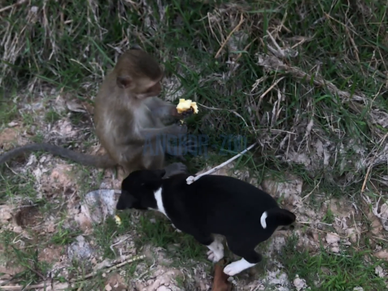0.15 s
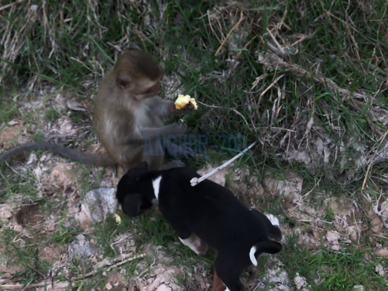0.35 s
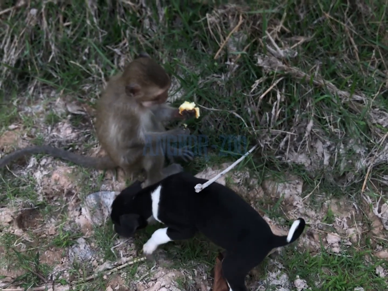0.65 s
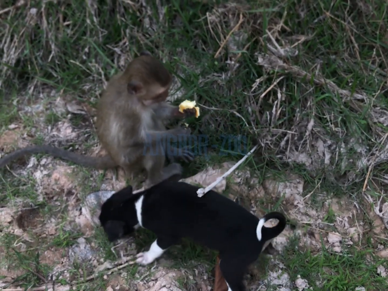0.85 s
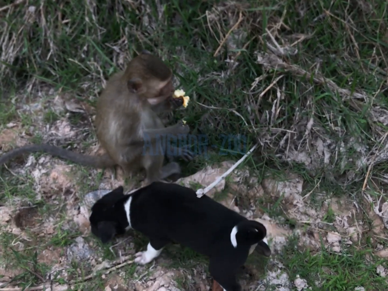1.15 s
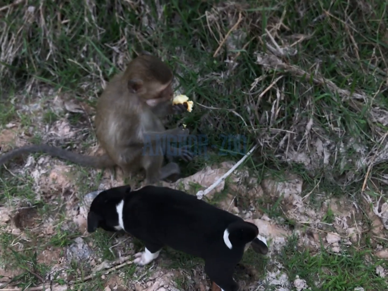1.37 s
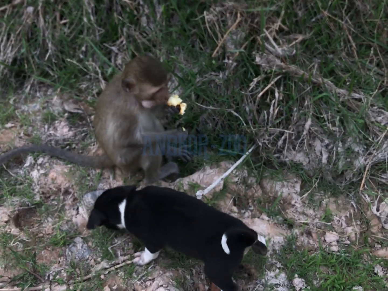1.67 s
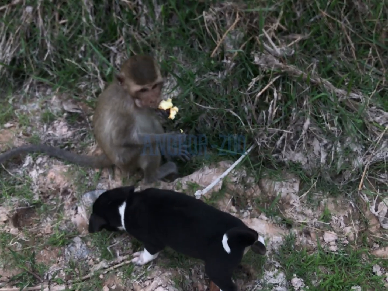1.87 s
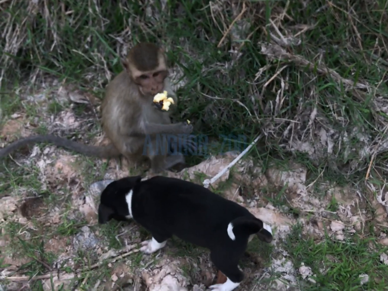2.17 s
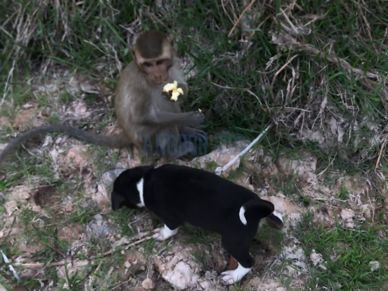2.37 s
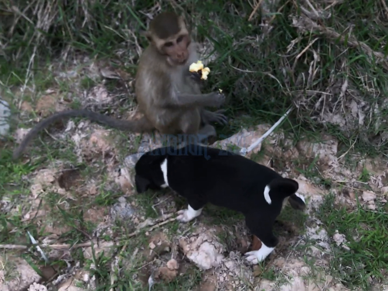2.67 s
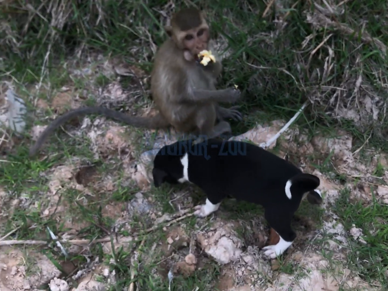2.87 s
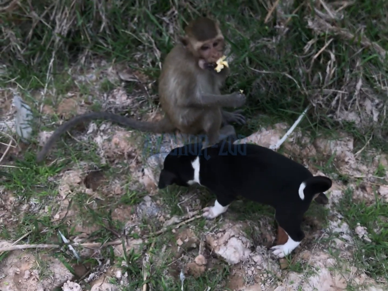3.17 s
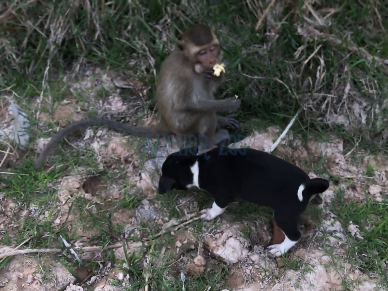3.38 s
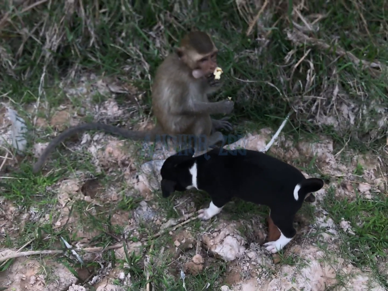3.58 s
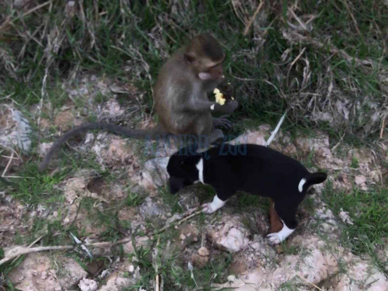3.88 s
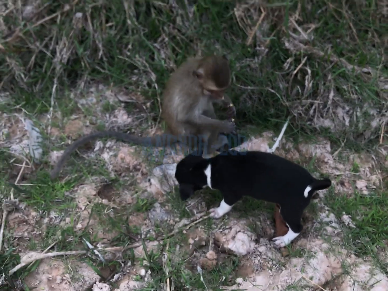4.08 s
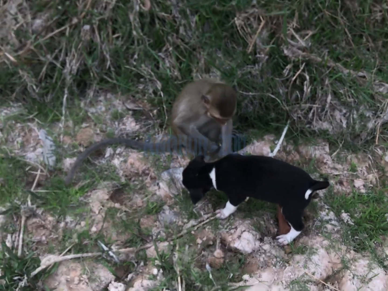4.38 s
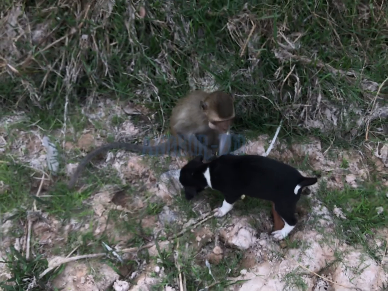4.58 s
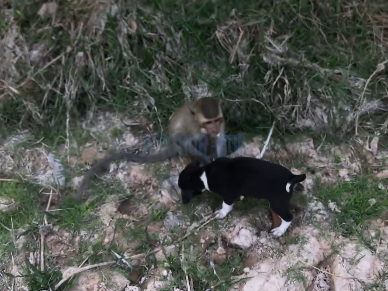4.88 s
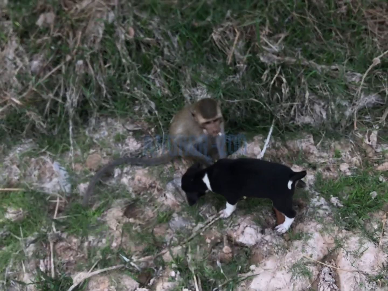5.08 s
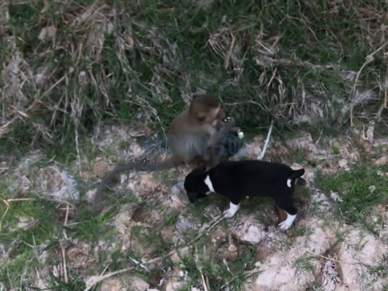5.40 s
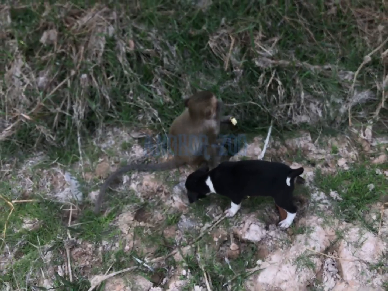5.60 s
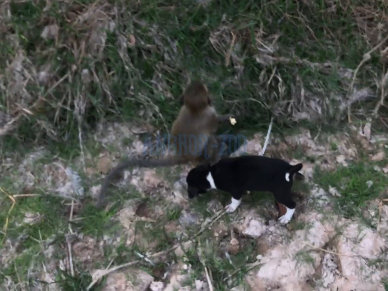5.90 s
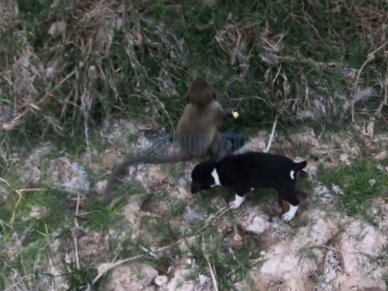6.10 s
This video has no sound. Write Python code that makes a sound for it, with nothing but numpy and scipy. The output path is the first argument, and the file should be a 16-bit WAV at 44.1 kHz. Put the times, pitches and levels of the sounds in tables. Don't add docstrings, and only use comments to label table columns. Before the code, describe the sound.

Outdoors in dry scrub, high clear whistled chirps dip, sweep down and glide up in short phrases, smeared by echoes off trees. A cluster of twig snaps cracks sharply near the start, and lighter rustling and pebble ticks follow midway. A cricket trills in regular bursts that grow louder. Low wind rumble and occasional dull knocks on the case mark a hand-held mono microphone.

```python
import sys
import numpy as np
from scipy import signal
from scipy.fft import rfft, irfft
from scipy.io import wavfile
from scipy.ndimage import uniform_filter1d

SR = 44100
rng = np.random.default_rng(int(sys.argv[2]) if len(sys.argv) > 2 else 0)


def natural_amplitude(level_db):
    exponent = np.asarray(level_db, float) / 20
    return 10 ** exponent


def dump_mix(stems):
    frames = np.atleast_2d(stems).T
    limited = np.clip(frames, -1, 1)
    pcm = np.round(limited * 32767).astype(np.int16)
    wavfile.write(sys.argv[1], SR, pcm)


N = 275625


def level(x, db):
    return x * natural_amplitude(db) / np.sqrt(np.mean(x ** 2))


def colour(x, spectrum):
    hz, db = np.transpose(spectrum)
    f_hz = np.arange(len(x) // 2 + 1) * SR / len(x) + 1
    gain_db = np.interp(np.log(f_hz), np.log(hz), db, -90, -90)
    return irfft(rfft(x) * natural_amplitude(gain_db), len(x))


def band(x, lo_hz, hi_hz):
    return signal.sosfilt(signal.butter(2, [lo_hz, hi_hz], "bandpass", fs=SR, output="sos"), x)


def high_pass(x, hz):
    return signal.sosfiltfilt(signal.butter(2, hz, "highpass", fs=SR, output="sos"), x)


def walk(rate_hz):
    hold = int(SR / rate_hz)
    steps = np.repeat(rng.standard_normal(N // hold + 1), hold)
    return 1.76 * uniform_filter1d(uniform_filter1d(steps, hold), hold)[:N]


def oscillator(hz):
    return np.sin(2 * np.pi * np.cumsum(hz) / SR)


def add(out, start_s, x):
    i = int(start_s * SR)
    out[i:i + len(x)] += x[:N - i]


def swell(rows, rise_db_per_s, fall_db_per_s):
    t = np.arange(N) / SR
    power = np.zeros(N)
    for start_s, hold_s, db in rows:
        before_db = rise_db_per_s * (start_s - t)
        after_db = fall_db_per_s * (t - start_s - hold_s)
        lost_db = np.maximum(np.maximum(before_db, after_db), 0)
        power += natural_amplitude(2 * (db - lost_db))
    return np.sqrt(power)


def sing(shape, accent_db, rows):
    share, height = np.transpose(shape)
    notes = []
    for start_s, length_s, lo_hz, hi_hz, db in rows:
        pitch_hz = lo_hz + (hi_hz - lo_hz) * height
        notes.append(np.transpose([start_s + length_s * share, pitch_hz, db + np.array(accent_db)]))
    return notes


def dip_notes():
    dip_shape = [(-1, .95), (-.5, .42), (0, 0), (.35, .38), (.75, .85), (1, 1)]
    dip_accent = [-3, -2, -8, -2, 2, -1.5]
    # lowest_s, fall_s, rise_s, low_hz, level_db
    dip_rows = [
        (.225, 0.049, 0.095, 2490, -39),
        (.425, .03, .022, 2630, -39),
        (.51, .02, .075, 2730, -43),
        (2.612, 0.036, 0.082, 2403, -41),
        (2.8, .042, .13, 2533, -42.5),
        (5.293, 0.063, 0.075, 2314, -41),
        (5.489, 0.038, 0.083, 2596, -41),
    ]
    top_hz = 2914
    share, height = np.transpose(dip_shape)
    notes = []
    for lowest_s, fall_s, rise_s, low_hz, db in dip_rows:
        time_s = lowest_s + share * np.where(share < 0, fall_s, rise_s)
        pitch_hz = low_hz + (top_hz - low_hz) * height
        notes.append(np.transpose([time_s, pitch_hz, db + np.array(dip_accent)]))
    return notes


def fall_notes():
    fall_accent = [-7, -3, 0, -2, -3, -2, -4, -7]
    # start_s, length_s, start_hz, early_sag, level_db
    fall_rows = [
        (0.59, 0.16, 3714, 1.7, -43),
        (2.935, 0.16, 3526, 1.17, -39),
        (5.583, .203, 3507, .62, -40.5),
    ]
    end_ratio = .805
    share = np.arange(len(fall_accent)) / (len(fall_accent) - 1)
    notes = []
    for start_s, length_s, hz, sag, db in fall_rows:
        pitch_hz = hz * (end_ratio + (1 - end_ratio) * (1 - share) ** sag)
        notes.append(np.transpose([start_s + length_s * share, pitch_hz, db + np.array(fall_accent)]))
    return notes


def song():
    scoop_shape = [(0, .6), (.12, .25), (.33, 0), (.55, .2), (.76, .6), (1, 1)]
    sweep_shape = [(0, 1), (.09, .86), (.2, .66), (.36, .51), (.6, .35), (.8, .16), (1, 0)]
    rise_shape = [(0, 0), (.15, .03), (.3, .16), (.47, .25), (.64, .45), (.83, .69), (1, 1)]
    hook_shape = [(0, 0), (.13, .85), (.45, .85), (.75, .95), (1, 1)]
    climb_shape = [(0, 0), (.35, .3), (.6, .6), (.87, .95), (1, 1)]
    scoop_accent = [-22, -14.5, -15.5, -8.5, -4, -4]
    sweep_accent = [-15, -2, 0, -5, -4, -10, -16]
    rise_accent = [-0.5, -3, -6.5, -2.5, -6, -3, -8]
    hook_accent = [-4, -5, -1, -4.5, -7]
    climb_accent = [-5, -8, 0, -5.5, -1]
    # start_s, length_s, low_hz, high_hz, level_db
    scoop_rows = [
        (2.346, .149, 2270, 3020, -38),
        (5.023, .128, 2323, 2995, -35),
    ]
    sweep_rows = [
        (.862, .22, 2100, 4330, -41),
        (3.33, .207, 1976, 4340, -39.5),
        (5.913, 0.21, 2153, 4170, -35.5),
    ]
    rise_rows = [
        (1.197, .318, 3505, 4720, -44),
        (3.733, .29, 3497, 4780, -41),
    ]
    hook_rows = [
        (1.703, 0.12, 3410, 3620, -36),
        (1.89, 0.12, 3520, 3914, -41.5),
        (4.285, 0.075, 3600, 3728, -38),
        (4.472, 0.21, 3650, 4127, -44.5),
    ]
    climb_rows = [(0.0, .12, 2260, 2900, -38), (1.653, .069, 3850, 4340, -42), (1.95, .12, 2860, 3220, -52),
                  (2.07, .105, 3200, 3900, -41), (2.03, .038, 3910, 4440, -48),
                  (2.11, .04, 4380, 4470, -57), (2.925, .06, 2900, 2960, -46), (3.81, .12, 2740, 3010, -55),
                  (4.018, .027, 4780, 5220, -49), (4.205, .057, 3900, 4370, -42),
                  (4.245, .045, 3550, 3700, -47), (4.48, .09, 3280, 3150, -57),
                  (4.57, .19, 3150, 3450, -42), (5.565, .05, 3120, 3250, -46), (1.255, .1, 2640, 2860, -51),
                  (1.355, .095, 2860, 3350, -53)]
    notes = dip_notes() + fall_notes()
    notes += sing(scoop_shape, scoop_accent, scoop_rows)
    notes += sing(sweep_shape, sweep_accent, sweep_rows)
    notes += sing(rise_shape, rise_accent, rise_rows)
    notes += sing(hook_shape, hook_accent, hook_rows)
    notes += sing(climb_shape, climb_accent, climb_rows)
    return notes


def far_calls():
    # start_s, length_s, pitch_hz, level_db
    far_rows = [
        (.05, 0.74, 1518, -57.5),
        (2.36, 0.24, 1526, -63),
        (2.619, .2, 1390, -58.5),
        (2.956, 0.135, 1367, -61),
        (3.565, .25, 1570, -69),
        (5.489, 0.358, 1020, -63),
        (5.934, .17, 1040, -55.5),
    ]
    return [[(start_s, hz, db), (start_s + length_s, hz, db)] for start_s, length_s, hz, db in far_rows]


def whistles(notes):
    out = np.zeros(N)
    waver, flutter = 1 + 0.0016 * walk(60), natural_amplitude(3.0 * walk(70))
    for note in notes:
        point_s, pitch_hz, db = np.transpose(note)
        at = np.arange(int(point_s[0] * SR), min(int(point_s[-1] * SR), N))
        t = at / SR
        glide_hz = uniform_filter1d(np.interp(t, point_s, pitch_hz), size=400, mode="nearest")
        edges = np.clip(np.minimum(t - point_s[0], point_s[-1] - t) / 0.0059, 0, 1)
        gain = np.sqrt(2) * natural_amplitude(np.interp(t, point_s, db)) * flutter[at] * edges
        out[at] += gain * oscillator(glide_hz * waver[at])
    return out


def trees(x):
    # delay_s, level_db
    trunks = [
        (.009, -5.5),
        (0.018, -13.5),
        (0.03, -13.5),
        (.052, -37),
    ]
    leaves_t60_s, thin_t60_s, scrub_db = 0.39, 1.2, 0.5
    t = np.arange(SR) / SR
    decay = natural_amplitude(-60 * t / leaves_t60_s) + natural_amplitude(-5.5 - 60 * t / thin_t60_s)
    tail = rng.standard_normal(SR) * decay * (1 - np.exp(-t / 0.002))
    tail[t > .155] *= natural_amplitude(3)
    tail *= natural_amplitude(scrub_db) / np.sqrt(np.sum(tail ** 2))
    for delay_s, db in trunks:
        tail[int(delay_s * SR)] += natural_amplitude(db)
    return signal.fftconvolve(x, tail)[:N]


def cricket():
    # stop_s, length_s, end_level_db
    burst_rows = [
        (0.785, .4, -51.5),
        (1.583, 0.46, -52),
        (2.401, .52, -50.5),
        (3.216, 0.39, -47.5),
        (3.889, .39, -48),
        (4.745, .55, -45.5),
        (5.591, 0.6, -43),
        (6.3, .48, -44.5),
    ]
    pitch_hz, strokes_hz = 8210, 199
    swell_db, warm_up = 9.5, 0.032
    t, left, bursts = np.arange(N) / SR, np.ones(N), np.zeros(N)
    for stop_s, length_s, db in burst_rows:
        on = (t > stop_s - length_s) & (t < stop_s)
        left[on] = (stop_s - t[on]) / length_s
        fade_in = (1 - left[on]) * length_s / .04
        fade_out = (stop_s - t[on]) / .005
        bursts[on] = natural_amplitude(db - swell_db * left[on]) * np.clip(np.minimum(fade_in, fade_out), 0, 1)
    cycle = np.cumsum(strokes_hz * (1 + .004 * walk(60))) / SR % 1
    stroke = np.sin(np.pi * np.clip(cycle / 1.03, 0, 1)) ** 2
    bend = .12 * (.4 - cycle) - warm_up * left + 0.00695 * walk(200)
    tone = oscillator(pitch_hz * (1 + bend))
    uneven = natural_amplitude(0.46 * walk(90) + 1.0 * walk(700))
    return level(stroke * tone * uneven, -0.92) * bursts


def rustle():
    # hz, db
    grass_colour = [(350, -39), (600, 3), (1400, 1), (1540, 1.5), (2700, 2.5), (3460, 2), (7970, 2),
                    (10500, 10), (14200, 2), (15800, -5)]
    # start_s, hold_s, level_db
    move_rows = [(0.0, .2, -47), (.282, .006, -41), (.3, .006, -29), (.312, .018, -33), (.35, .04, -49),
                 (.43, .06, -48), (.72, .03, -47), (1.36, .05, -47), (1.9, .06, -52), (2.36, .05, -49),
                 (2.54, .06, -38.5), (2.63, .07, -41), (2.73, .04, -35.5), (2.8, .12, -39),
                 (2.95, .02, -42), (3.003, .012, -36), (3.05, .12, -47), (3.39, .1, -42), (3.64, .05, -45),
                 (3.76, .1, -48), (4.02, .02, -47), (4.24, .5, -48), (4.84, .12, -44), (5.0, .42, -48.5),
                 (5.62, .12, -46), (5.89, .04, -50), (6.01, .03, -44), (6.12, .2, -48)]
    sizes_db = 2.13 * rng.exponential(size=N // 40 + 1).repeat(40)[:N] + 2.3 * walk(45)
    grass = colour(rng.standard_normal(N) * natural_amplitude(sizes_db), grass_colour)
    moves = swell(move_rows, rise_db_per_s=1300, fall_db_per_s=330)
    tips = band(grass, 11500, 17500)
    stalks = band(grass, 1000, 9500) * natural_amplitude(1.2 * walk(40))
    tips_gain = np.sqrt(np.maximum(moves ** 2 - natural_amplitude(2 * -54.0), 0))
    stalks_gain = np.sqrt(np.maximum((moves * natural_amplitude(-14.5)) ** 2 - natural_amplitude(2 * -66.0), 0))
    return tips / np.std(tips) * tips_gain + stalks / np.std(band(stalks, 5926, 6480)) * stalks_gain


def crack(lo_hz, hi_hz, decay_samples):
    burst = rng.standard_normal(300) * np.exp(-np.arange(300) / decay_samples)
    x = band(burst, lo_hz, hi_hz)
    return x / np.abs(x).max()


def ring(hz, t60_s, rise_s):
    t = np.arange(SR // 2) / SR
    x = np.sin(2 * np.pi * hz * t) * natural_amplitude(-60 * t / t60_s) * (1 - np.exp(-t / rise_s))
    return x / np.abs(x).max()


def splinters():
    # start_s, length_s, rate_per_s, peak_db
    runs = [
        (.297, .03, 250, -22),
        (.358, .028, 100, -29),
        (2.6, .4, 20, -30),
        (3.0, .024, 170, -27),
        (3.09, .13, 40, -29),
    ]
    rows = []
    for start_s, length_s, rate, db in runs:
        for k, (when, size, wood) in enumerate(rng.random((int(length_s * rate), 3))):
            rows.append((start_s + (k + when) / rate, db + 6 * size - 3, db - 8 * wood))
    return rows


def twigs():
    # start_s, peak_db, wood_db
    snap_rows = [(0.2775, -15.0, -23.0), (0.2966, -13.0, -19.0), (0.3, -12.0, -22.0),
                 (0.3051, -15.0, -22.0), (0.3184, -17.0, -24.0), (0.344, -19.0, -20.0),
                 (0.3516, -10.0, -21.0), (0.3761, -3.6, -9.0), (0.3796, -6.0, -24.0), (0.3818, -9.0, -20.0),
                 (0.3834, -9.0, -18.0), (2.5412, -25.0, -39.0), (2.6045, -24.0, -32.0),
                 (2.6703, -27.0, -24.0), (3.0874, -27.0, -27.0), (3.1728, -25.0, -39.0),
                 (3.21, -21.0, -29.0), (3.4898, -15.0, -23.0), (3.6879, -25.0, -31.0)]
    out = np.zeros(N)
    for start_s, db, wood_db in snap_rows + splinters():
        split = natural_amplitude(db + .7) * crack(9800, 16000, 17)
        wood = natural_amplitude(wood_db - 1.5) * crack(1300, 7000, 30)
        add(out, start_s, split + wood)
    return out


def pebbles():
    # start_s, peak_db, ring_hz
    tick_rows = [(0.905, -37, 1040), (1.767, -41.5, 980), (3.058, -32, 863), (3.101, -30.5, 1066),
                 (3.148, -35.5, 1050), (3.19, -41, 923), (3.249, -35, 1060), (3.308, -33, 1060),
                 (3.903, -38, 980), (4.231, -43, 1010), (4.367, -38, 1210), (4.57, -33.5, 845),
                 (5.078, -36, 1120)]
    out = np.zeros(N)
    for start_s, db, hz in tick_rows:
        body = ring(hz, 0.024, 0.00012) + natural_amplitude(-1.5) * ring(1.7 * hz, 0.017, 0.00012)
        add(out, start_s + 0.00076, natural_amplitude(db) * body)
        add(out, start_s + 0.001, natural_amplitude(db + 4) * crack(400, 3600, 58))
    return out


def case_knocks():
    # start_s, peak_db, ring_hz
    knock_rows = [(0.713, -33.5, 225), (1.401, -31.5, 468), (1.794, -38, 300), (2.241, -38.5, 402),
                  (3.03, -32.5, 224.4), (3.049, -33, 226), (4.608, -32.5, 242.9), (4.697, -20.5, 363),
                  (4.704, -20, 328), (4.715, -22, 360), (5.236, -44, 234), (5.323, -33.5, 263),
                  (5.749, -26, 271)]
    out = np.zeros(N)
    for start_s, db, hz in knock_rows:
        body = ring(hz, 0.03, 0.0015) + natural_amplitude(-10.5) * ring(1.47 * hz, 0.057, 0.0012)
        add(out, start_s + 0.0012, natural_amplitude(db) * body)
    return out


def wind_puffs():
    # start_s, peak_db, pitch_hz
    puff_rows = [
        (0.144, -22.5, 87),
        (2.647, -22, 88.2),
        (4.139, -20.5, 85.2),
        (5.837, -25, 74.8),
    ]
    out = np.zeros(N)
    for start_s, db, hz in puff_rows:
        add(out, start_s, natural_amplitude(db) * ring(hz, 0.33, 0.0038))
    return out


def wind():
    # time_s, gust_db
    gust_points = [(0.0, -41), (.35, -38), (.6, -43), (1.7, -39.5), (2.3, -39), (3.5, -39), (4.3, -39),
                   (5.2, -38.5), (5.6, -39), (6.25, -39)]
    # hz, db
    rumble_colour = [(12, -59), (20, -29), (24, -6), (34, -19), (54, 4), (81, 1), (113, 1.5), (146, -9.5),
                     (173, -16.5), (260, -20.5), (340, -23), (570, -120)]
    rush_db, rush_rise_db, turn_s = -62.5, 9.5, 4.26
    t = np.arange(N) / SR
    point_s, point_db = np.transpose(gust_points)
    gust_db = np.interp(t, point_s, point_db)
    flicker = natural_amplitude(1.22 * walk(9))
    rumble = level(colour(rng.standard_normal(N), rumble_colour) * flicker, 1.62) * natural_amplitude(gust_db)
    rush = band(rng.standard_normal(N), 253, 461) * natural_amplitude(2.0 * walk(25))
    turned = np.clip((t - turn_s) / 0.33, 0, 1)
    return rumble + level(rush, rush_db) * natural_amplitude(rush_rise_db * turned + 3.0 * (gust_db + 40))


def chirper():
    # start_s, hold_s, level_db
    chirp_rows = [
        (.94, .12, -61),
        (1.39, .07, -59.5),
        (1.53, .1, -63),
        (1.72, .25, -67),
        (3.64, .1, -62),
        (4.02, 0.14, -63),
        (5.28, 0.092, -63),
        (5.5, 0.22, -64.5),
    ]
    tone = oscillator(5125 * (1 + 0.0038 * walk(120)))
    return np.sqrt(2) * tone * natural_amplitude(2.8 * walk(45)) * swell(chirp_rows, 300, 120)


def air():
    # hz, db
    air_colour = [(88, -44), (150, 2.5), (190, -7), (244, -14.5), (758, -17), (1410, -16), (2300, -21),
                  (3610, -20), (4840, -24.5), (7290, -24.5), (8030, -23.5), (10400, -23.5), (12600, -19.5),
                  (14100, -15.5), (15900, -26)]
    floor_db = -50.5
    floor = colour(rng.standard_normal(N), air_colour) * natural_amplitude(0.067 * walk(6.94))
    throb = oscillator(60.2 * (1 + 0.0037 * walk(3.8)))
    floor += .4 * throb * high_pass(floor, 11500)
    return floor / np.std(band(floor, 265, 3600)) * natural_amplitude(floor_db)


def scene():
    calls = whistles(song()) + whistles(far_calls())
    voices = natural_amplitude(1.37) * calls + trees(calls)
    ground = rustle() + twigs() + pebbles()
    handling = case_knocks() + wind_puffs()
    mono = voices + cricket() + ground + handling + wind() + chirper() + air()
    return np.array([mono, mono])


def roll_off(x):
    return signal.sosfilt(signal.butter(12, 16990, fs=SR, output="sos"), x)


def record(dry):
    port = signal.butter(1, [9900, 10900], "bandpass", fs=SR, output="sos")
    dipped = dry - 0.38 * signal.sosfiltfilt(port, dry)
    top = signal.butter(8, 16000, fs=SR, output="sos")
    mix = signal.sosfilt(top, dipped)
    return roll_off(mix)


dry = scene()
out = record(dry)
dump_mix(out)
```